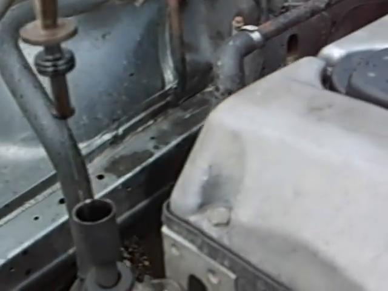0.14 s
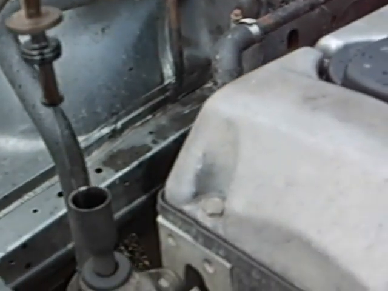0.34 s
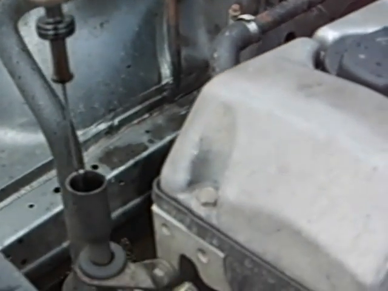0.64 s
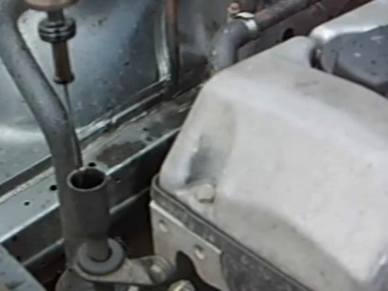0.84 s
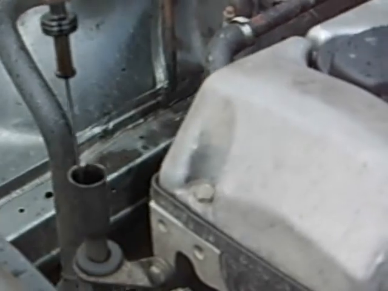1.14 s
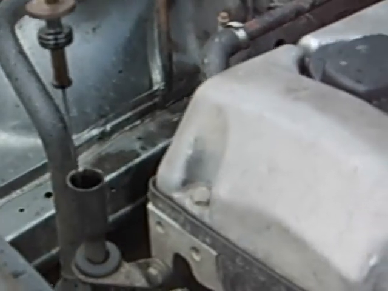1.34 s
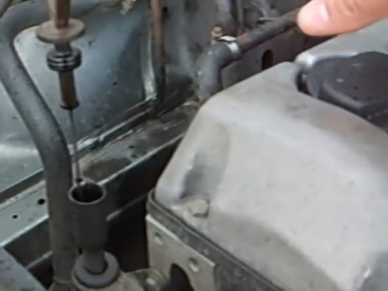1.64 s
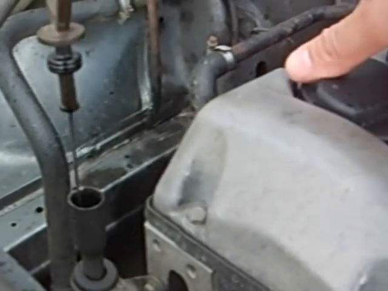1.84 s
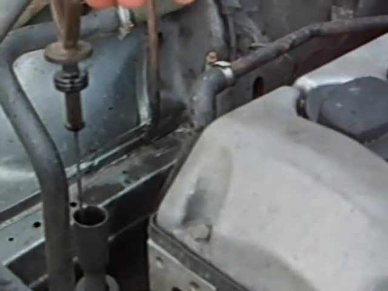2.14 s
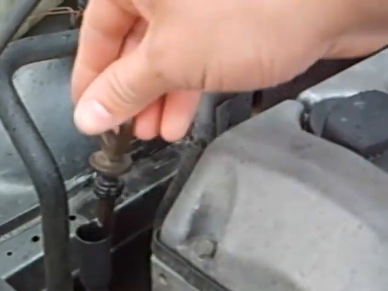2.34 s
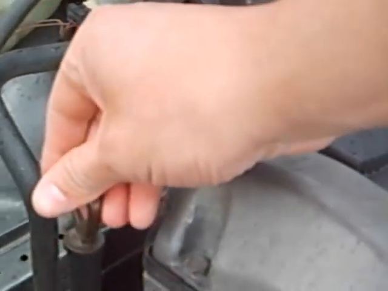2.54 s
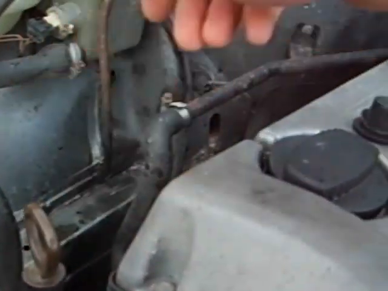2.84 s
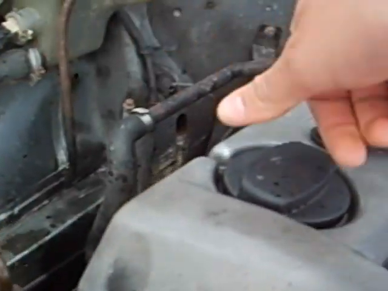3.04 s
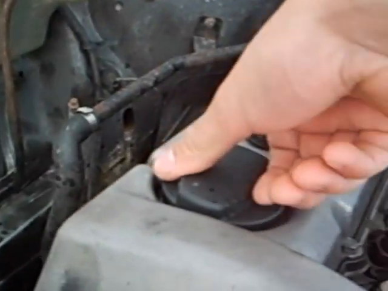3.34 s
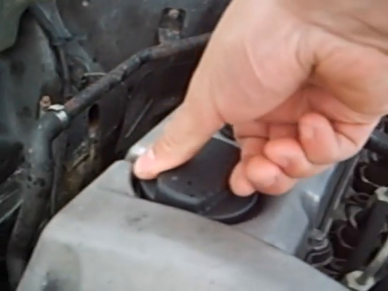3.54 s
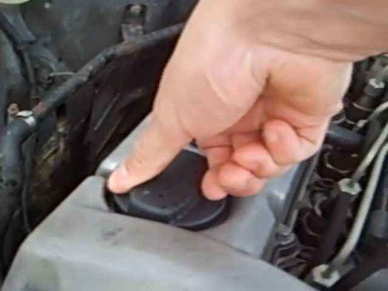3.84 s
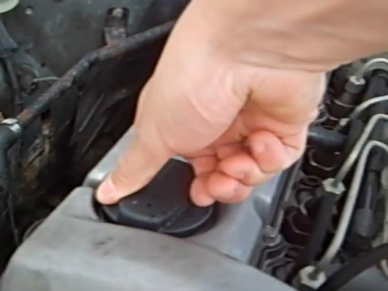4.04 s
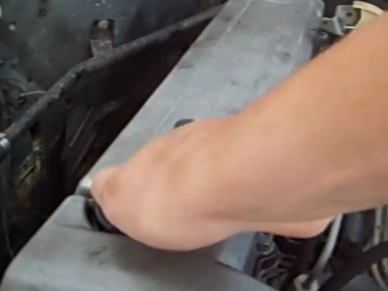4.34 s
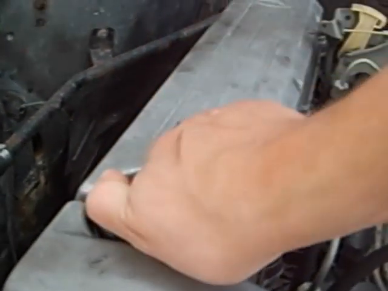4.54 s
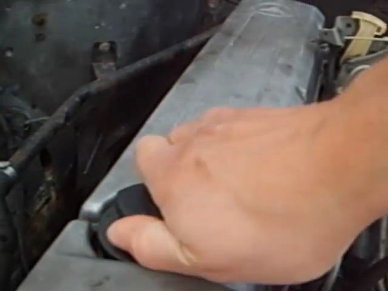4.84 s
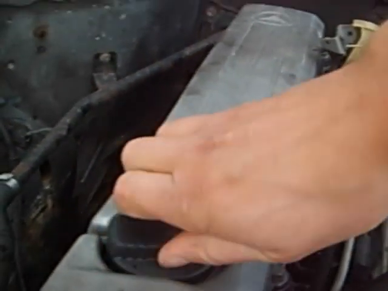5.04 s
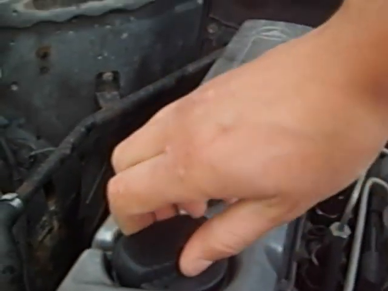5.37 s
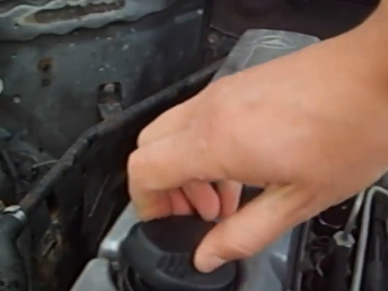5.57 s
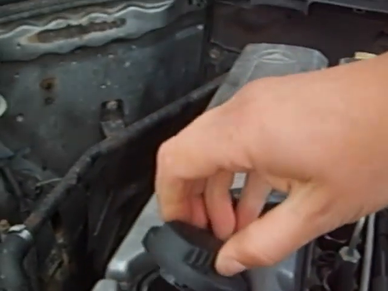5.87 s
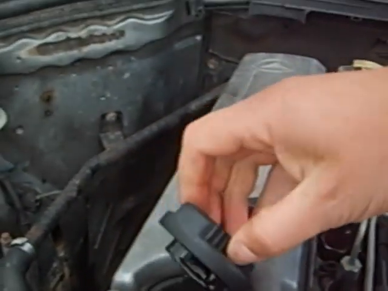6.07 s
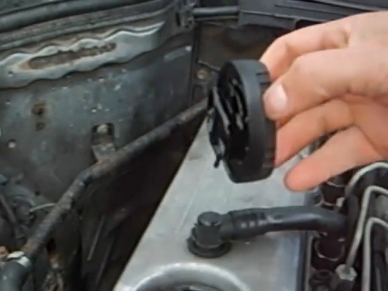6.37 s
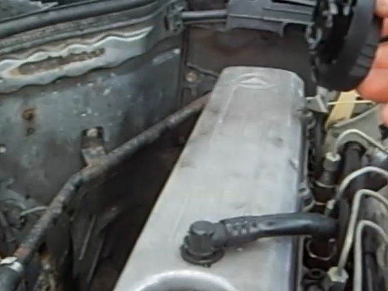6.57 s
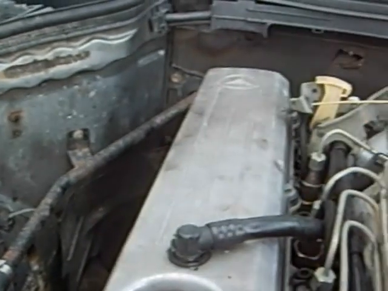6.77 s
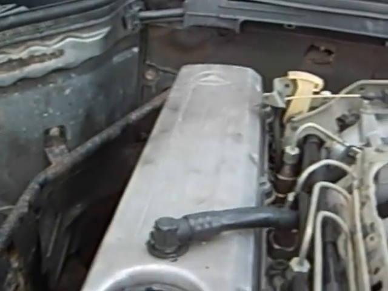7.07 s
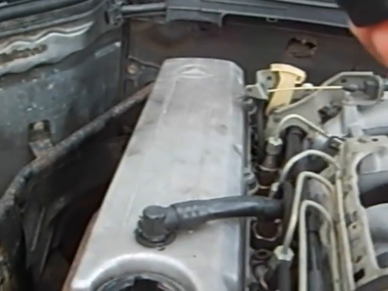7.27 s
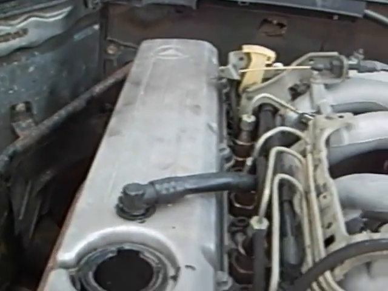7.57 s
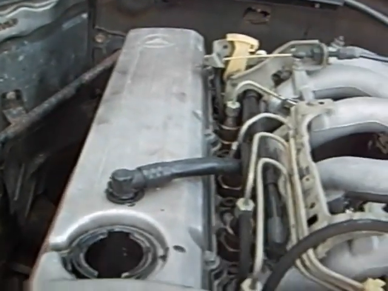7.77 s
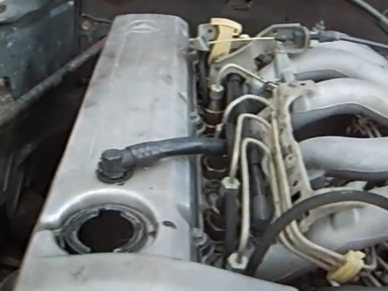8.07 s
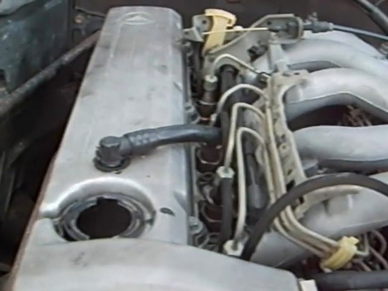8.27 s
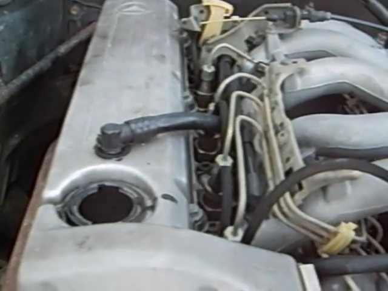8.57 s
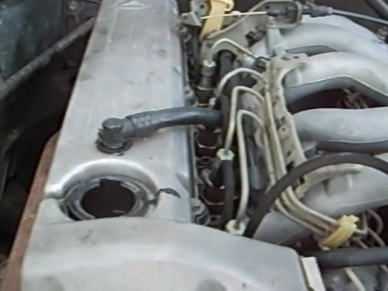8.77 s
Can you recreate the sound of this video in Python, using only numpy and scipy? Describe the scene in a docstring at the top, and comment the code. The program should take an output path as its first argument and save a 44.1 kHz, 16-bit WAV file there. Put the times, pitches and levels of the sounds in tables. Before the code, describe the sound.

A close diesel engine revs twice with a loud roar, then winds down to a knocking, clattering idle.

```python
"""In an open engine bay, very close up, a five-cylinder diesel is revved twice and sinks back to idle.
The revs roar, growl and boom, overloading the microphone as it moves along the engine. Each firing
thumps the block and shakes the valve gear; while fuel is injected each cylinder adds a bright metallic
knock. The dipstick scrapes home, then the oil filler cap comes off and lets out hum, puffs and chatter."""
import sys
import numpy as np
from scipy import signal
from scipy.fft import rfft, irfft, next_fast_len
from scipy.io import wavfile
from scipy.ndimage import map_coordinates

SR = 44100
rng = np.random.default_rng(int(sys.argv[2]) if len(sys.argv) > 2 else 0)


def bounce(signal):
    """Save signal as a 16-bit WAV file at the path given by the first command-line argument."""
    frames = np.transpose(np.atleast_2d(signal))
    limited = np.clip(frames, -1, 1)
    pcm = np.round(limited * 32767).astype(np.int16)
    wavfile.write(sys.argv[1], SR, pcm)


N = 392931
T = np.arange(N) / SR


def amp(db):
    """Decibels to gain."""
    return 10 ** (np.asarray(db) / 20)


def unit(x):
    """Scale to rms 1."""
    return x / np.sqrt(np.mean(x ** 2) + 1e-20)


def curves(rows):
    """One automation curve for each column after the time."""
    s, *cols = np.transpose(rows)
    return [np.interp(T, s, c) for c in cols]


def ramp(start_s, length_s):
    """Fade from 0 to 1, then hold."""
    return np.clip((T - start_s) / length_s, 0, 1)


def wobble(rate):
    """A smooth random curve, rate knots a second."""
    return map_coordinates(rng.standard_normal(int(N * rate / SR) + 4), [T * rate])


def colour_db(hz, points, modes=()):
    """A smooth EQ curve lifted at the resonances."""
    f, level = np.transpose(points)
    lifts = sum(lift / (1 + (2 * (hz - centre) / width) ** 2) for centre, width, lift in modes)
    return np.interp(np.log(hz + 1), np.log(f), level) + lifts


def coloured(x, points, modes=()):
    """Play x through that EQ, as a causal filter of unit power gain."""
    hz = np.fft.rfftfreq(8192, 1 / SR)
    cepstrum = irfft(np.log(unit(amp(colour_db(hz, points, modes)))))
    half = len(cepstrum) // 2
    cepstrum[1:half] *= 2  # fold to minimum phase
    cepstrum[half + 1:] = 0
    return signal.fftconvolve(x, irfft(np.exp(rfft(cepstrum))))[:N]


def tone(cycles, db, waver_db):
    """A slightly wavering sine of the given rms level."""
    return np.sqrt(2) * amp(db + waver_db * wobble(14)) * np.sin(2 * np.pi * (cycles + rng.random()))


def strikes(at, shapes):
    """Lay one shape at each start sample."""
    index = at[:, None] + np.arange(shapes.shape[1])
    return np.bincount(index.ravel(), shapes.ravel(), N)[:N]


def rattles(cylinder, size, common, own):
    """A dense rattle per firing: part alike for all, part the cylinder's own, the rest chance."""
    chance = rng.standard_normal((len(cylinder), size))
    paths = rng.standard_normal((len(CYLINDERS), size))[cylinder]
    varied = np.sqrt(own) * paths + np.sqrt(1 - own) * chance
    return np.sqrt(common) * rng.standard_normal(size) + np.sqrt(1 - common) * varied


# two revs, a long coast, a sag below idle, recovery: time_s, firing_rate_hz
ENGINE_SPEED = [(0, 117), (.13, 111.5), (.34, 137.5), (.84, 106), (1, 131), (1.61, 94), (2.1, 68),
                (2.45, 51.5), (2.85, 30.6), (3.03, 26), (3.22, 26.3), (3.42, 27.63), (3.9, 28.03)]
IDLE_HZ, REV_HZ = ENGINE_SPEED[-1][1], 120  # firing rates

def crank(first_cylinder_s=3.8256):
    """The crankshaft's clock: firing rate, running count, and each firing's sample and cylinder."""
    speed, = curves(ENGINE_SPEED)
    count = np.cumsum(speed) / SR
    count -= np.interp(first_cylinder_s, T, count)
    at = np.flatnonzero(np.diff(np.floor(count)) > 0)
    cylinder = np.floor(count[at + 1]).astype(int) % len(CYLINDERS)
    return speed, count, at, cylinder


# throttle pushes: start_s, held_s, fuel_over_idle_db
THROTTLE = [(.01, 0.23, 5), (.77, 0.16, 7)]

def fuelling(speed, attack_s=0.04, release_s=0.12, governor_s=2.67, sag_db_per_hz=0.5):
    """Fuel per firing, 1 at idle: a burst per push, none coasting, then the governor catches the sag."""
    pushes = sum(amp(db) * (ramp(s, attack_s) - ramp(s + held, release_s)) for s, held, db in THROTTLE)
    sag_hz = np.maximum(IDLE_HZ - speed, 0)
    return pushes + ramp(governor_s, 0.13) * amp(sag_db_per_hz * sag_hz)


# the roar swells with speed: firing_rate_hz, level_db
ROAR_SWELL = [(28.1, -56), (30, -30.5), (38, -22), (54, -17), (71, -15), (100, -8.5), (130, -6.5)]
# its broad, bright body: freq_hz, gain_db
ROAR_EQ = [(25, -25), (80, -20), (170, -9.5), (320, -6.5), (500, -5.5), (750, -5.5), (1000, 2), (1300, 0.5),
           (2000, -2), (2500, -2), (3500, -3.5), (5600, -1), (7400, -4.5), (10000, -11.5), (11000, -20.5),
           (12500, -23), (14500, -60)]
# ring of the block and covers: pitch_hz, width_hz, lift_db
BLOCK_MODES = [(606, 26, 9), (759, 45, 11), (1410, 50, 3.5), (1936, 83, 6), (5140, 120, -1.5),
               (7150, 110, 6)]

def roar(count, speed, pulsing_db=1, grain_db=1.26):
    """At speed the clatter merges into a grainy roar."""
    hiss = rng.standard_normal(N) * amp(pulsing_db * np.cos(2 * np.pi * count) + grain_db * wobble(400))
    return amp(np.interp(speed, *np.transpose(ROAR_SWELL))) * unit(coloured(hiss, ROAR_EQ, BLOCK_MODES))


# throaty midrange: freq_hz, gain_db
GROWL_EQ = [(50, -30), (170, -17.5), (290, -9), (380, -7.5), (480, 1), (640, 0), (780, -4.5), (1000, -11.5),
            (1900, -2), (3000, -16), (7000, -49)]

def growl(count, speed, rev_db=-14.5, db_per_octave=20, uneven_db=3, waver_db=1):
    """What repeats with every camshaft turn gives a stack of close partials that glide with speed."""
    size, partials = 4096, 256
    lines = amp(uneven_db * rng.standard_normal(partials)) * np.exp(2j * np.pi * rng.random(partials))
    lines[1::2] *= amp(-10)  # half orders sit under the crankshaft orders
    lines[:2 * len(CYLINDERS) + 1] = 0  # leave the low end to the boom
    turn = np.interp(count / len(CYLINDERS), np.arange(size) / size, irfft(lines, size), period=1)
    db = rev_db + db_per_octave * np.log2(speed / REV_HZ)
    return amp(db + waver_db * wobble(24.65)) * unit(coloured(turn, GROWL_EQ))


# firing orders 1 to 4: relative_db, lift_per_unit_fuel_db
BOOM_PARTIALS = [(0, 3), (-.5, 0.5), (-4.5, 1), (-11.5, -0.5)]
# how the bay carries the boom: freq_hz, gain_db
BAY_EQ = [(25, -52), (35, -41), (78, -35.5), (105, -42.5), (170, -32), (270, -30.5), (310, -42),
          (380, -25.5), (500, -17.5)]
# air resonances of the bay: pitch_hz, width_hz, lift_db
BAY_MODES = [(87, 8.7, 4), (219, 38, 11), (265, 24, 6.5)]

def boom(count, speed, fuel, db_per_octave=8):
    """The low firing orders grow with speed and swell as they glide through the bay's resonances."""
    drive_db = db_per_octave * np.log2(speed / REV_HZ)
    sound = np.zeros(N)
    for order, (db, fuel_db) in enumerate(BOOM_PARTIALS, 1):
        bay_db = colour_db(order * speed, BAY_EQ, BAY_MODES)
        sound += tone(order * count, db + drive_db + fuel_db * fuel + bay_db, waver_db=2)
    return sound


# each cylinder's voice, in firing order: front_knock_db, back_knock_db, injection_s, needle_hz, thump_db
CYLINDERS = [(1, -2.5, 0.0048, 465, -0.5), (4, 2, 0.0018, 600, -0.5), (-2, 4, 0.0032, 590, 0),
             (1.5, -2, 0.0022, 590, -2), (5.5, -2.5, 0.0033, 384, 0)]
# steely top end: freq_hz, gain_db
KNOCK_EQ = [(400, -49), (1400, -22), (2600, -51), (4200, -16), (5500, -4.5), (6050, -1), (6700, -0.5),
            (7700, 2.5), (9000, -0.5), (10000, -0.5), (10900, -11), (12300, -12), (13300, -27),
            (14500, -66)]
# ring of the injectors and their pipes: pitch_hz, width_hz, lift_db
INJECTOR_MODES = [(6060, 160, 7.5), (7940, 190, 1), (9600, 110, 2), (12100, 250, 0.5)]

def knock(at, cylinder, fuel, place, near_db, trim_db=-2.08, attack_s=0.0012, ring_t60=0.025,
          tail_db=-17, tail_t60=0.1, jitter=0.041):
    """An injector needle chatters through each injection; each beat rings the steel, the bay rings on."""
    t = np.arange(2400) / SR
    front_db, back_db, injection_s, needle_hz, _ = np.array(CYLINDERS)[cylinder].T
    scatter_db, timing = rng.standard_normal((len(at), 2)).T
    db = trim_db + near_db[at] + front_db + place[at] * (back_db - front_db) + scatter_db
    decay = np.hypot(amp(-60 * t / ring_t60), amp(tail_db - 60 * t / tail_t60))
    ring = (1 - np.exp(-t / attack_s)) * decay * rattles(cylinder, len(t), common=0.064, own=0.64)
    # even out the rings' energy in the steel's band
    steel = signal.butter(2, (5800, 10000), "bandpass", fs=SR, output="sos")
    ring /= np.linalg.norm(signal.sosfilt(steel, ring), axis=1, keepdims=True)
    gap_s = np.exp(jitter * timing) / needle_hz
    needle = np.zeros(N)
    for beat in range(6):
        strength = fuel[at] * amp(db) * np.clip(injection_s / gap_s - beat, 0, 1)
        needle += strikes(at + np.round(beat * gap_s).astype(int), strength[:, None] * ring)
    return coloured(needle, KNOCK_EQ, INJECTOR_MODES)


def shaking(at, cylinder, speed, scatter_db=0.39, whirr_db=-5):
    """Each firing jolts the block and rattles the valve gear over the whirr of chain and belts."""
    t = np.arange(5000) / SR
    force = amp(np.array(CYLINDERS)[cylinder, -1] + scatter_db * rng.standard_normal(len(at)))
    force /= np.sqrt(speed[at])  # same power however fast the firings come

    def jolts(attack_s, t60, common, own):
        envelope = force[:, None] * (1 - np.exp(-t / attack_s)) * amp(-60 * t / t60)
        return strikes(at, envelope * rattles(cylinder, len(t), common, own))

    block = jolts(attack_s=0.003, t60=0.25, common=0.55, own=0.3)
    clacks = jolts(attack_s=0.001, t60=0.27, common=0.029, own=0.22)
    gear = unit(clacks) * amp(1.5 * wobble(350)) + amp(whirr_db) * rng.standard_normal(N)
    return block, gear


# dull weight of the block: freq_hz, gain_db
THUMP_EQ = [(25, -36), (55, -19), (85, -17.5), (155, 1), (240, -5.5), (350, -1.5), (420, -4), (555, 3.5),
            (680, 1.5), (900, -5), (1500, -9), (3000, -45)]

def thump(block, shade_db, level_db=-35):
    """The block answers each firing with a low thud."""
    return amp(level_db + shade_db) * unit(coloured(block, THUMP_EQ))


# hard mechanical mids: freq_hz, gain_db
CLATTER_EQ = [(40, -22.5), (200, -11.5), (600, -10), (900, -1), (1400, 1.5), (1900, 1.5), (2300, -3.5),
              (2700, -4), (4000, -3.5), (5500, -2.5), (7500, -9), (9800, -15), (11000, -29), (12400, -20),
              (14200, -48)]
# ring of the valve cover: pitch_hz, width_hz, lift_db
COVER_MODES = [(612, 13, 9.5), (1440, 170, 3.5), (1670, 53, 1), (2226, 91, 4)]

def clatter(gear, fuel, near_db, idle_db=-24.5, coasting=0.52):
    """The valve gear clatters through its cover, harder with more fuel."""
    load = coasting + (1 - coasting) * fuel
    return load * amp(idle_db + 0.74 * near_db) * unit(coloured(gear, CLATTER_EQ, COVER_MODES))


# pings in one camshaft turn: offset_firings, pitch_hz, level_db
VALVE_PINGS = [(.08, 4450, -22), (.5, 1426, -20.5), (1.22, 2153, -21), (1.3, 1413, -23.5),
               (2.198, 3390, -21.5), (2.35, 1490, -37), (3.298, 1394, -24.5), (4.152, 1610, -21)]

def pings(count, t60=0.027, attack_s=0.00096, scatter_db=1.5, detune=0.01):
    """Tappets and springs ring briefly, each at its own angle of the camshaft."""
    t = np.arange(2400) / SR
    sound = np.zeros(N)
    for offset, hz, db in VALVE_PINGS:
        turns = np.floor((count - offset) / len(CYLINDERS))
        at = np.flatnonzero(np.diff(turns) > 0)
        size, pitch = rng.standard_normal((2, len(at), 1))
        envelope = amp(db + scatter_db * size - 60 * t / t60) * (1 - np.exp(-t / attack_s))
        sound += strikes(at, envelope * np.sin(2 * np.pi * hz * (1 + detune * pitch) * t))
    return sound


# the dipstick scrapes down and seats: start_s, level_db
SCRAPES = [(2.2056, -11), (2.2854, -14), (2.3557, -19), (2.374, -14), (2.408, -18), (2.45, -24),
           (2.471, -15), (2.6162, -16.5)]
# thin, bright guide tube: freq_hz, gain_db
TUBE_EQ = [(800, -20), (2200, -15), (3200, 3.5), (4600, 0), (6000, -9), (10000, -6), (14000, -39)]

def dipstick(attack_s=0.00079, t60=0.066):
    """The steel blade chatters against its guide tube."""
    t = np.arange(6000) / SR
    start_s, db = np.transpose(SCRAPES)
    envelopes = amp(db[:, None] - 60 * t / t60) * (1 - np.exp(-t / attack_s))
    scrapes = envelopes * rng.standard_normal(envelopes.shape)
    return coloured(strikes(np.round(start_s * SR).astype(int), scrapes), TUBE_EQ)


# the oil filler's hollow voice opens up: time_s, resonance_hz, level_db
FILLER_VOICE = [(4.2, 327, -59), (4.8, 336, -45), (5.4, 337, -41), (6, 364, -39), (7, 355, -42.5),
                (7.3, 347, -52), (7.7, 346, -44.5), (8.25, 342, -52), (8.8, 348, -42)]

def filler_hum(count, speed, orders=(12, 13, 14), width_hz=15.6):
    """The air under the valve cover picks out the firing orders nearest its resonance."""
    hz, db = curves(FILLER_VOICE)
    return sum(tone(k * count, db, waver_db=0.5) / np.hypot(1, 2 * (k * speed - hz) / width_hz)
               for k in orders)


# soft, hollow breath: freq_hz, gain_db
PUFF_EQ = [(120, -20), (200, -9.5), (290, -15), (350, 3.5), (410, -7.5), (480, 2), (600, -1), (750, -12),
           (1500, -39)]

def filler_puffs(block, lift_db=5):
    """Crankcase gas puffs out of the filler with each firing."""
    _, db = curves(FILLER_VOICE)
    return amp(lift_db + db) * unit(coloured(block, PUFF_EQ))


# narrow, nasal peak: freq_hz, gain_db
CHATTER_EQ = [(1500, -23), (2050, -9.5), (2250, 7.5), (2450, -10), (3000, -6), (4500, -28)]

def filler_chatter(gear, level_db=-37, cap_off_s=5.47, lift_s=0.49):
    """Valve chatter escapes as the filler cap is lifted off."""
    return amp(level_db) * ramp(cap_off_s, lift_s) * unit(coloured(gear, CHATTER_EQ))


# passes of the hand: centre_s, half_width_s, knock_db, thump_db
HAND_PASSES = [(4.02, 0.33, -0.5, -1.5), (6.6, 0.37, -3, -1)]

def hand_shade():
    """A hand between engine and microphone ducks the knock and the thump; both in dB."""
    return sum(np.outer(db, np.exp(-((T - s) / width) ** 2)) for s, width, *db in HAND_PASSES)


# microphone move along the cylinder head: time_s, place (0 front, 1 further back), nearness_db
MIC_PATH = [(2.7, 0.17, -3.5), (3.4, .14, 0.96), (5.8, 0.1, 0), (7.1, 0.32, -1.46)]

def scene():
    """The mono mix: everything but the dipstick follows the one crankshaft."""
    speed, count, at, cylinder = crank()
    fuel = fuelling(speed)
    place, near_db = curves(MIC_PATH)
    knock_shade_db, thump_shade_db = hand_shade()
    injectors = knock(at, cylinder, fuel, place, near_db + knock_shade_db)
    block, gear = shaking(at, cylinder, speed)
    ticking = thump(block, thump_shade_db) + clatter(gear, fuel, near_db) + pings(count)
    filler = filler_hum(count, speed) + filler_puffs(block) + filler_chatter(gear)
    revving = roar(count, speed) + growl(count, speed) + boom(count, speed, fuel)
    return (injectors + ticking + filler + revving + dipstick())[None]


def record(dry, ceiling=0.93, hardness=12, rolloff_hz=13200, top_hz=15620):
    """The microphone input flattens the loudest peaks; the top treble rolls off."""
    clipped = dry / (1 + np.abs(dry / ceiling) ** hardness) ** (1 / hardness)
    size = next_fast_len(N + SR // 2)
    hz = np.fft.rfftfreq(size, 1 / SR)
    response = (hz < top_hz) / np.sqrt(1 + (hz / rolloff_hz) ** 10)
    return irfft(rfft(clipped, size) * response, size)[:, :N]


dry = scene()
out = record(dry)
bounce(out)
```